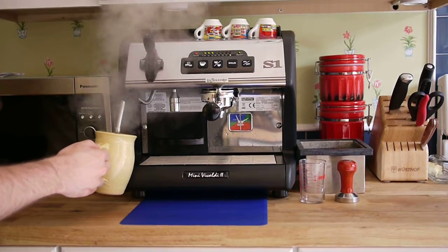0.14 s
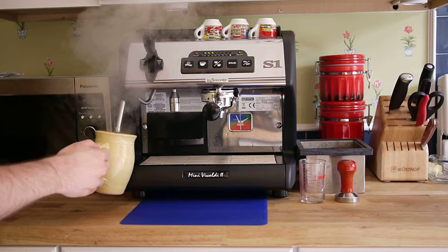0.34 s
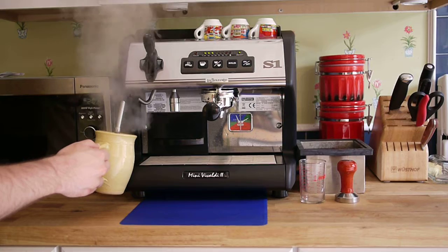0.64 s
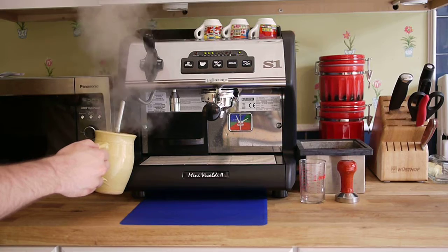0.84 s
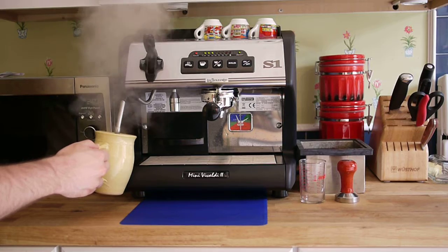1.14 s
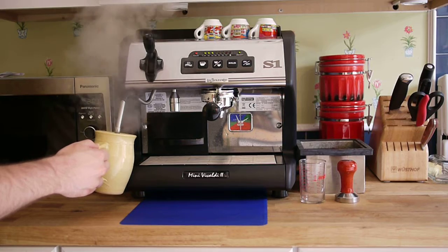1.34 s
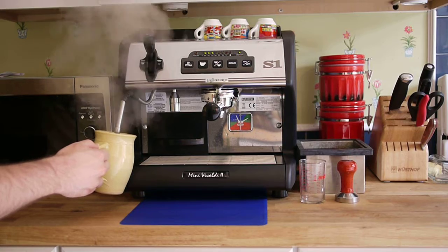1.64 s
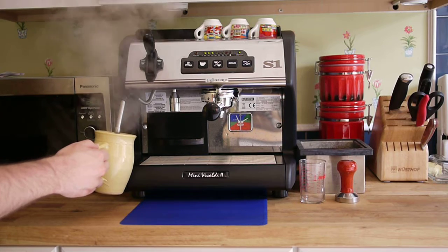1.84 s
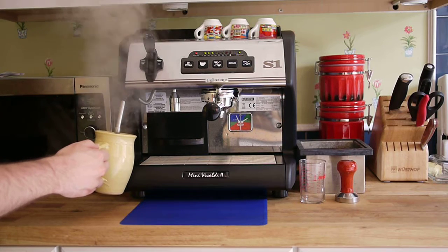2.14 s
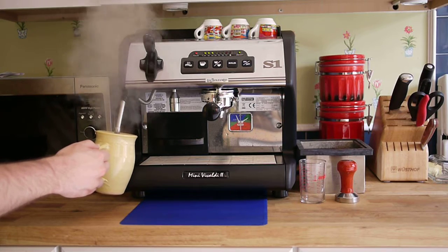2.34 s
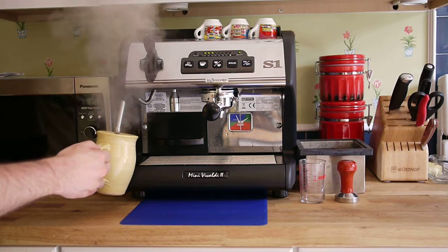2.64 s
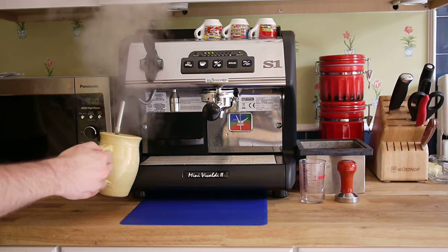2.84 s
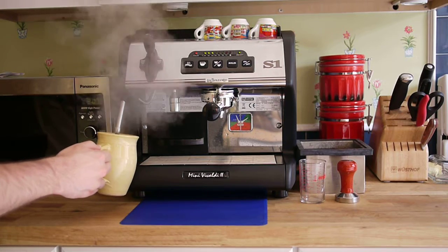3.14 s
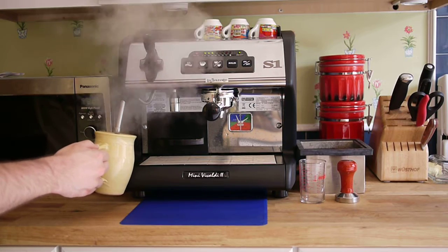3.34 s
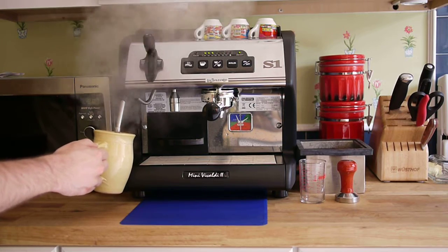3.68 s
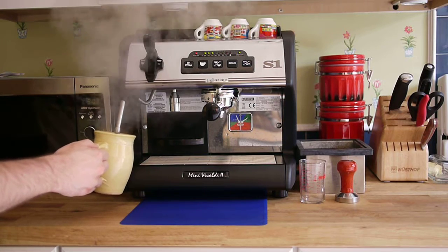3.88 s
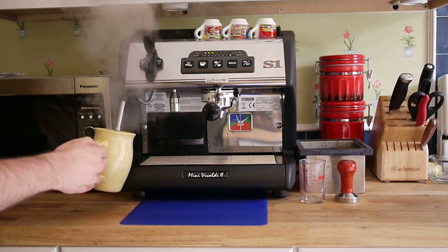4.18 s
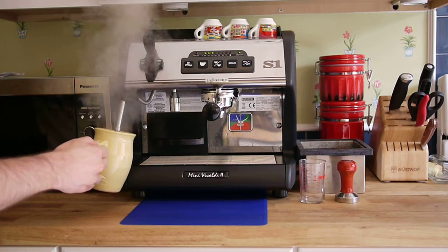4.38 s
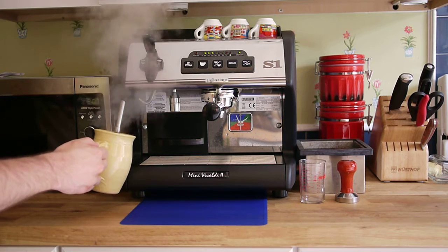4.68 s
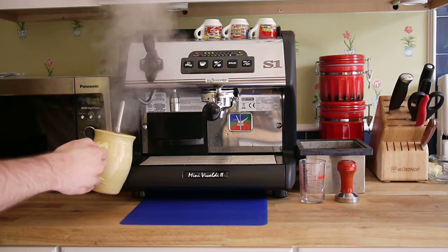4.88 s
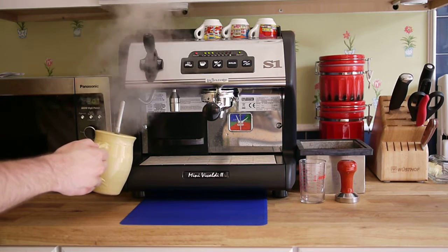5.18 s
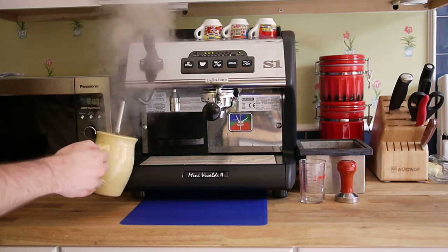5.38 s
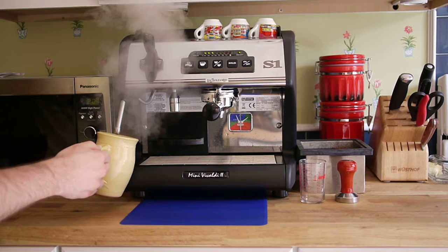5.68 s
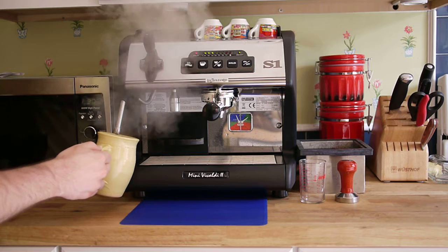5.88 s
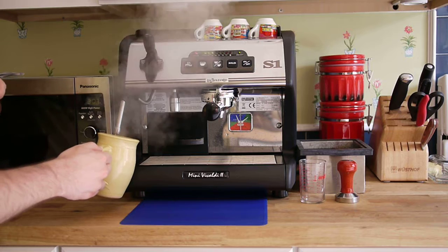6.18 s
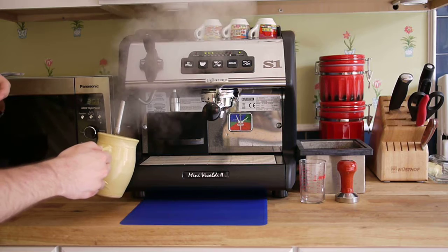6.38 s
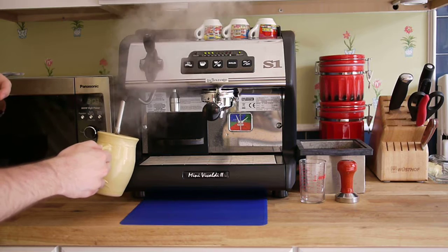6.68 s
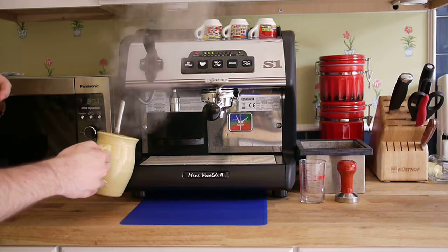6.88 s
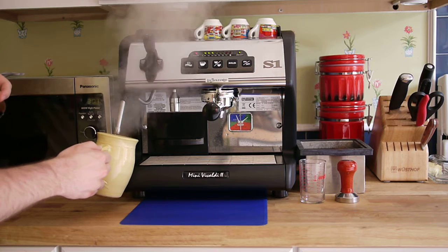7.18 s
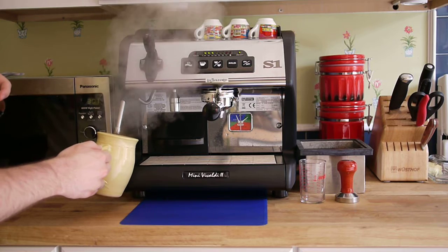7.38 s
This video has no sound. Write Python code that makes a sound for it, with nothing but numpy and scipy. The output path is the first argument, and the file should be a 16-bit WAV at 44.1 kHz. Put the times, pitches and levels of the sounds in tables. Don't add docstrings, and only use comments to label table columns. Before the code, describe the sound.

A steam wand blows continuously into a hand-held mug on a kitchen counter. Breathy hiss sits over a hollow, mid-low boom from the mug's air. Brief whistling chirps, small puffs and short booms ripple through it, with a bigger puff past five seconds and another near seven. A faint appliance hum lies beneath. Small single microphone, slightly dull on top, with short room reflections.

```python
import sys
import numpy as np
from scipy import signal
from scipy.fft import rfft, irfft, next_fast_len
from scipy.io import wavfile
from scipy.ndimage import uniform_filter1d

SR = 44100
rng = np.random.default_rng(int(sys.argv[2]) if len(sys.argv) > 2 else 0)


def ratio_of_db(decibels):
    return 10 ** (np.asarray(decibels, float) / 20)


def output_pcm(signal):
    pcm = np.clip(np.atleast_2d(signal).T, -1, 1) * 32767
    wavfile.write(sys.argv[1], SR, np.round(pcm).astype(np.int16))


N = 331632


def evened(x):
    return x / np.sqrt(np.mean(x ** 2) + 1e-20)


def read(points, hz):
    f, value = np.transpose(points)
    return np.interp(np.log(hz + 1), np.log(f + 1), value)


def bell(x, centre, width, order=2):
    return 2. ** (-(2 * (x - centre) / width) ** order)


def mode(hz, centre_hz, width_hz, steep):
    distance = abs(2 * (hz - centre_hz) / width_hz)
    return evened((1 + distance ** (2 * steep)) ** -.5)


def swells(t, rows):
    return sum(db * bell(t, s, length, order=4) for s, length, db in rows)


def hum():
    # (frequency [Hz], level [dB rms])
    hum_tones = [(59, -88), (83, -86), (104, -80), (120, -85), (179, -75), (233.5, -70.5), (257, -75),
                 (360, -75)]
    hz, db = np.transpose(hum_tones)[:, :, None]
    waver = uniform_filter1d(rng.standard_normal((len(hz), N)), size=SR // 3, axis=1)
    turns = hz * np.arange(N) / SR + rng.random((len(hz), 1))
    tones = np.sqrt(2) * ratio_of_db(db + 3.1 * evened(waver)) * np.sin(2 * np.pi * turns)
    return tones.sum(axis=0)


def kitchen(x):
    # (frequency [Hz], width
    # [Hz], level [dB])
    standing_waves = [(104, 16, 5), (130, 12, -3), (165, 14, -5), (179, 8, 5), (215, 30, -3.5),
                      (257, 14, 5), (285, 12, -5), (305, 30, 2.5), (345, 14, -4), (382, 26, -2),
                      (413, 12, 4), (468, 12, -3), (506, 18, -6), (576, 30, -2), (659, 12, 5.5),
                      (675, 10, -6), (692, 11, 4.5), (705, 10, -6), (718, 8, 4), (733, 14, -4),
                      (754, 16, 4), (767, 6, -8), (778, 14, 5), (798, 12, -8), (815, 20, -3), (857, 18, -4),
                      (891, 14, -5), (925, 12, -8), (978, 14, 4.5), (1035, 36, -4.5)]
    # (frequency [Hz], width [Hz], level [dB])
    surface_comb = [(1065, 16, 2.2), (1092, 16, -2.5), (1103, 100, 1.5), (1119, 16, 2.0), (1141, 16, -2.2),
                    (1157, 16, 2.0), (1189, 24, -3.8), (1248, 24, -5.0), (1297, 36, 4.1), (1372, 24, -4.3),
                    (1415, 16, -3.2), (1485, 16, 2.8), (1555, 24, -4.9), (1674, 16, -2.1), (1684, 60, 3.7),
                    (1900, 100, -3.3), (1927, 16, -2.7), (1975, 16, 2.5), (2013, 16, 3.1), (2067, 36, -5.7),
                    (2121, 24, 2.6), (2164, 36, 5.7), (2207, 16, -5.9), (2304, 60, 3.6), (2379, 16, -2.4),
                    (2411, 24, 4.9), (2449, 16, 2.4), (2578, 16, -3.5), (2627, 24, -4.5), (2680, 24, -2.2),
                    (2793, 20, -3.9), (2944, 30, -3.9), (3041, 30, -2.5), (3090, 20, 3.2), (3111, 120, 5.1),
                  (3122, 20, -2.5), (3224, 30, -4.2), (3316, 20, -3.8), (3386, 45, -4.0), (3477, 30, 2.4),
                  (3542, 45, -3.0), (3725, 45, -2.9), (3784, 30, -2.3), (3854, 45, 3.2), (3983, 120, 1.5),
                  (4112, 45, 3.6), (4252, 20, -2.6), (4328, 120, -1.5), (4667, 70, -1.9), (4801, 20, 2.5),
                  (4904, 20, -2.9), (4968, 45, 4.3), (5022, 30, -2.7), (5092, 30, 3.3), (5356, 45, -3.6),
                  (5507, 45, -2.4), (5717, 120, 1.0), (5937, 70, 2.9), (6126, 120, -1.6), (6260, 45, 2.6)]
    room_size = next_fast_len(N + SR)
    hz, t = np.fft.rfftfreq(room_size, 1 / SR), np.arange(SR // 2) / SR
    colour_db = sum(1.17 * db * bell(hz, f, width) for f, width, db in standing_waves)
    colour_db += sum(1.15 * db * bell(hz, f, width) for f, width, db in surface_comb)
    tail = rng.standard_normal(len(t)) * ratio_of_db(-60 * t / 0.35) * (t > 0.02)
    tail *= ratio_of_db(-12) / np.linalg.norm(tail)
    tail_share = np.clip((hz - 900) / 1500, 0, 1)
    response = ratio_of_db(colour_db) * (1 + tail_share * rfft(tail, room_size))
    return irfft(rfft(x, room_size) * response, room_size)[:N]


def knock(hz, t):
    return np.outer(bell(hz, 35, 40), swells(t, [(.37, .08, 12)]))


def spray(hz, t):
    # (time [s], length [s], level [dB])
    spray_moves = [
        (.63, .12, 2),
        (2.92, .12, 0),
        (4.3, 0.43, -2),
        (4.824, .15, 5),
        (5.317, 0.09, -1),
        (6.85, .12, -3.5),
    ]
    return np.outer(bell(hz, 1940, 430), swells(t, spray_moves))


def whistle(hz, t):
    # (time [s], length [s], level [dB])
    whistle_moves = [
        (.33, 0.091, 6.5),
        (1.85, 0.12, 6),
        (3.43, .1, -6),
        (4.222, .1, 5),
        (4.652, 0.23, 4.5),
        (5.6, .35, -1),
        (6.4, 0.09, 6),
        (6.6, 0.24, -4),
        (7.42, .15, -2),
    ]
    return np.outer(bell(hz, 3120, 110), swells(t, whistle_moves))


def puffs(hz, t):
    # (time [s], length [s], level [dB])
    water_slugs = [
        (.63, .12, 1.2),
        (3.05, .15, .8),
        (5.32, .12, 3.3),
        (6.05, .08, 1),
        (7.06, .07, 3),
        (7.28, .15, 1.2),
    ]
    return np.outer(bell(hz, 3350, 4700), swells(t, water_slugs))


def mug_moves(t, drive_db):
    # (time [s], length [s], upper mode level [dB])
    rim_swings = [
        (3.02, .5, 6.5),
        (6.2, .8, 2),
        (5.1, .8, -2.5),
        (2.1, .25, -2),
    ]
    # (time [s], length [s], level [dB])
    cavity_booms = [
        (.2, 0.13, 3.5),
        (1.602, 0.061, 5),
        (2.59, 0.055, 3.5),
        (3.05, 0.18, -4),
        (3.6, 0.28, 1),
        (4.2, .3, -0.5),
        (4.985, 0.092, 3.5),
        (5.33, 0.092, -5),
        (7.047, 0.083, 3),
        (7.4, 0.039, 5.5),
    ]
    swing_db = swells(t, rim_swings)
    cavity_db = swells(t, cavity_booms) - 0.27 * swing_db
    follows = 0, 2.2, 1.1, 0.68
    return np.outer(follows, drive_db - drive_db.mean()) + [0 * t, cavity_db, 0 * t, swing_db]


def eddies(hz, t):
    real, imaginary = rng.standard_normal((2, len(hz), len(t)))
    chance = real + 1j * imaginary
    steadying = 0.35 * bell(hz, 300, 1600)[:, None]
    return chance / (abs(chance) + 1e-9) ** steadying


def gusts(hz, t):
    patches = uniform_filter1d(rng.standard_normal((len(hz), len(t))), size=20, axis=0)
    patches = evened(uniform_filter1d(patches, size=9, axis=1))
    shared = evened(uniform_filter1d(rng.standard_normal(len(t)), size=6))
    return 0.4 * patches + 0.4 * shared


def steam():
    # (frequency [Hz], level [dB per Hz])
    hiss_curve = [(1500, -36), (2100, -9.5), (2700, -5), (3500, -4), (4100, -2.5), (4600, -4), (5800, -2),
                  (6300, -4.5), (7100, -6), (8100, -10)]
    # (frequency [Hz], level [dB per Hz])
    roar_curve = [(20, -25), (45, -20.5), (80, -24.5), (150, -7), (300, -6), (550, -2), (900, 2),
                  (1200, -2), (1700, -5), (1950, -5), (2300, -14.5), (3000, -48.5)]
    # (time [s], jet strength [dB], drive of the mug air [dB])
    jet_course = [(0, -41, -2), (.9, -41, -2), (1.6, -40, -2.5), (2.1, -40.5, -2.5), (2.6, -40, -2),
                  (3.7, -40, -1.5), (4.4, -40.5, -3), (5.0, -40, -3), (5.5, -41.5, -1.5), (6.0, -40, -1.5),
                  (6.8, -40.5, -2), (7.52, -40.5, -1.5)]
    window, hop = 1024, 256
    hz = np.fft.rfftfreq(window, 1 / SR)
    t = (np.arange(N // hop + 9) * hop - window) / SR
    s, *columns = np.transpose(jet_course)
    jet_db, drive_db = (np.interp(t, s, column) for column in columns)

    hiss, roar = evened(ratio_of_db(read(hiss_curve, hz))), evened(ratio_of_db(read(roar_curve, hz)))
    cavity, upper = mode(hz, 725, 134, 2.45), mode(hz, 2333, 390, 1.6)
    layers = zip((hiss, cavity, roar, upper), mug_moves(t, drive_db), (4.5, -0.46, -3.5, -12.0))
    power = sum(np.outer(shape, ratio_of_db(db + trim_db)) ** 2 for shape, db, trim_db in layers)

    flares_db = puffs(hz, t) + whistle(hz, t) + spray(hz, t) + knock(hz, t)
    z = eddies(hz, t) * np.sqrt(power) * ratio_of_db(gusts(hz, t) + flares_db + jet_db)
    noise = signal.istft(z, nperseg=window, noverlap=window - hop)[1]
    return noise[window:][:N] * ratio_of_db(-28.0)


def scene():
    return np.tile(kitchen(steam()) + hum(), (2, 1))


def band_limit(x):
    return signal.sosfilt(signal.butter(12, 9220, fs=SR, output="sos"), x)


def record(dry):
    # (frequency [Hz], level [dB])
    guard_curve = [(7000, 0), (7400, -3), (7600, -5), (7800, -12), (7900, -20), (7950, -27), (8000, -38),
                   (8020, -90)]
    # (frequency [Hz], level [dB])
    mirror_curve = [(8000, -1), (8100, -3), (8200, -7), (8400, -12), (8700, -20), (9000, -36), (9100, -43),
                    (9200, -52), (9250, -60)]
    mic_rate_hz = 16000
    hz = np.fft.rfftfreq(N, 1 / SR)
    sampled = irfft(rfft(dry) * ratio_of_db(read(guard_curve, hz)), N)
    folded = 2 * sampled * np.cos(2 * np.pi * mic_rate_hz * np.arange(N) / SR)
    leak = ratio_of_db(read(mirror_curve, hz)) * (hz > mic_rate_hz / 2)
    mix = sampled + irfft(rfft(folded) * leak, N)
    return band_limit(mix)


dry = scene()
out = record(dry)
output_pcm(out)
```